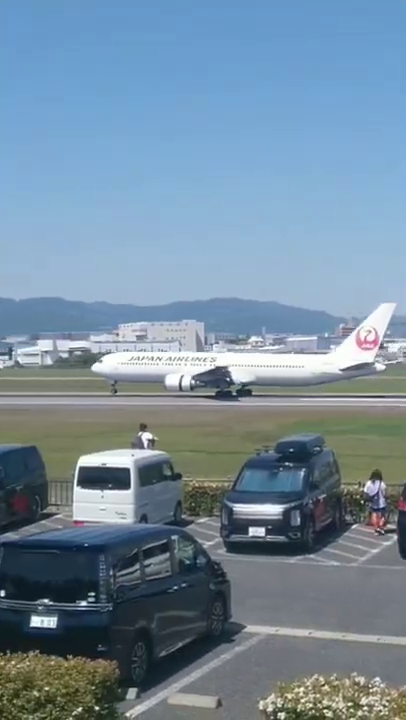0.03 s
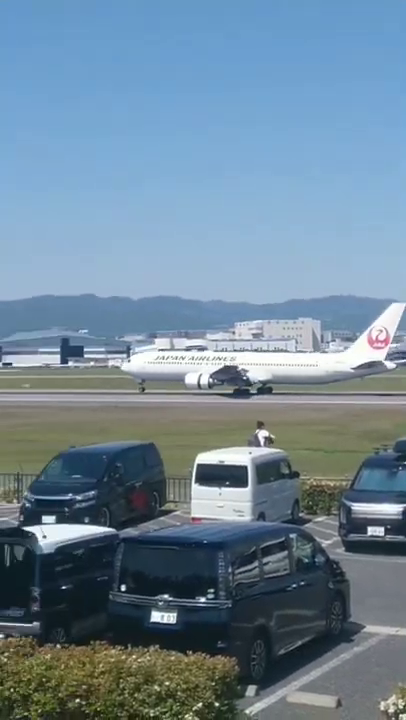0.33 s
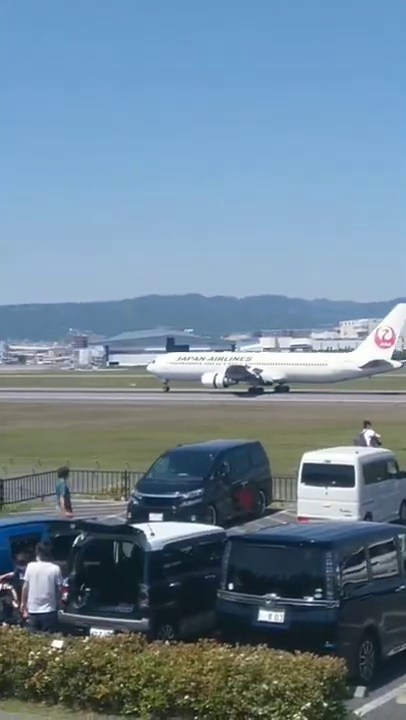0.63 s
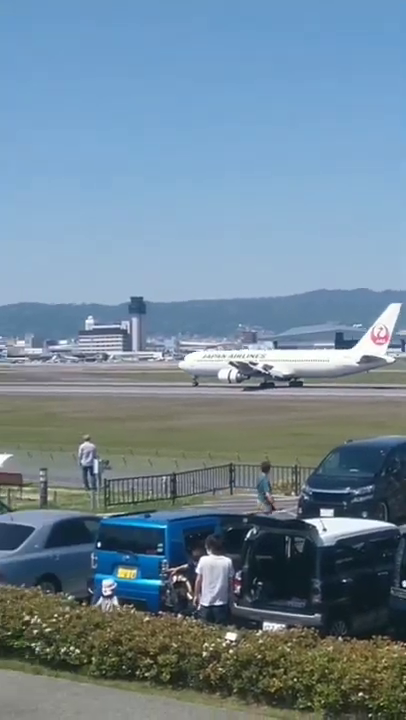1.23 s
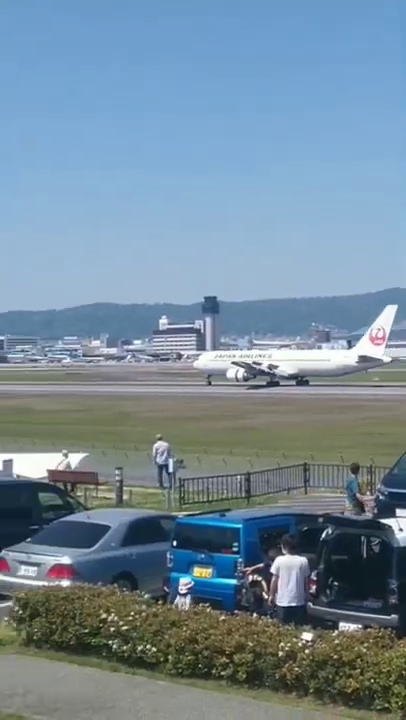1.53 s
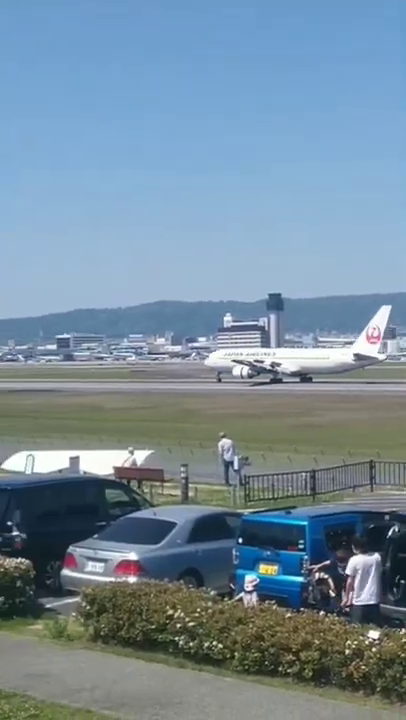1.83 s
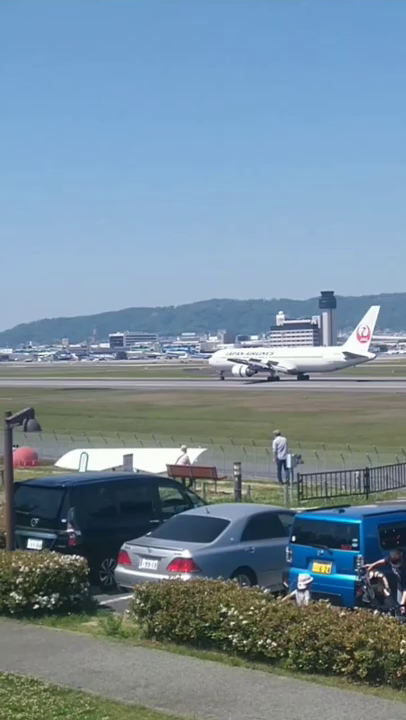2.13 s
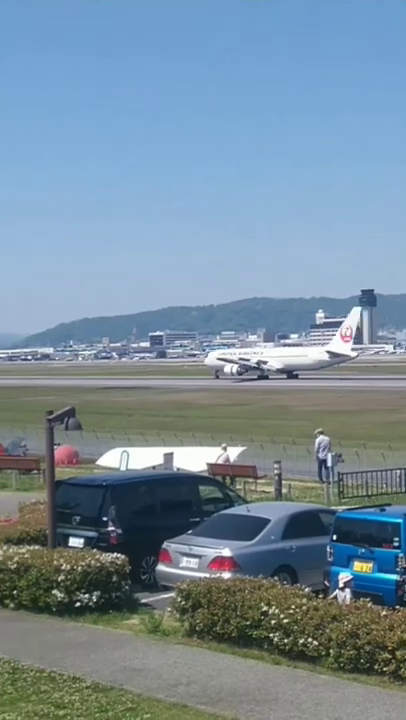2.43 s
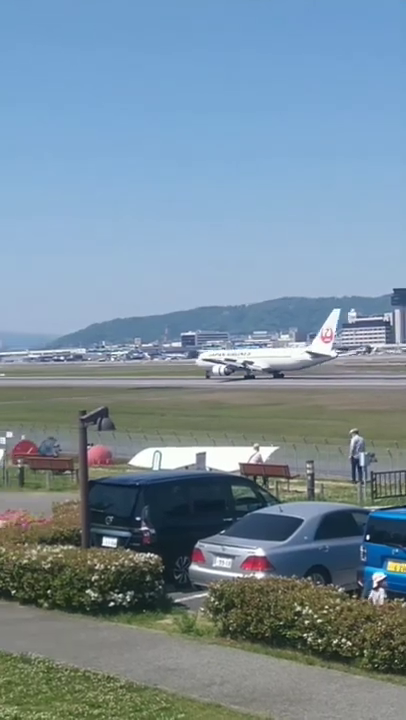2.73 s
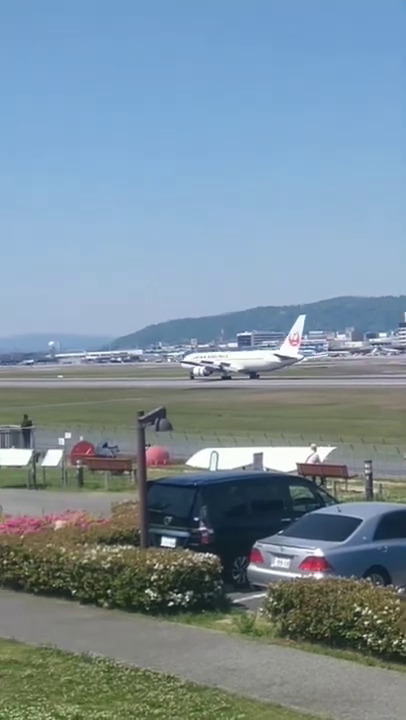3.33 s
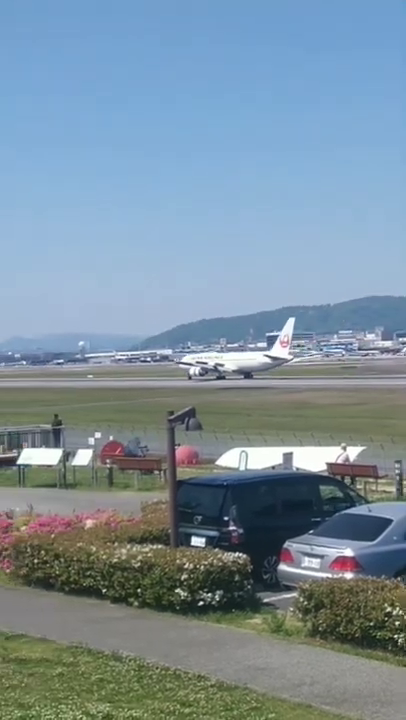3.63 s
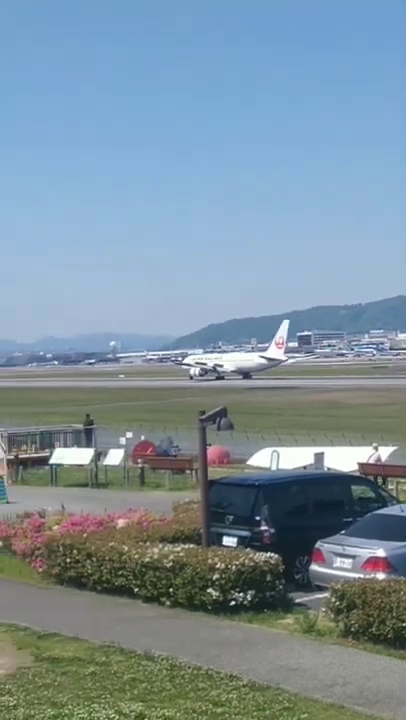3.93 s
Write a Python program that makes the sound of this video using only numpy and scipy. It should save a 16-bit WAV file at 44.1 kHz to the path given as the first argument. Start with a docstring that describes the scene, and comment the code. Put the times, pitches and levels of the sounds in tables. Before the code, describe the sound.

A jet airliner roars down a runway, its rumble and whine slowly receding.

```python
"""A jet airliner's rumble, roar and slightly crackling hiss swell and fade as it rolls away down a
runway at take-off power. The exhaust makes the noise; moving air makes it surge and flicker.
The fan's blurred whine sinks in pitch as it recedes. The ground reflection combs the spectrum and
hollows out one band. It is heard from a park through a hand-held pair of microphone ports, with
faint rustles and handling ticks close by."""
import sys
import numpy as np
from scipy import signal
from scipy.fft import rfft, irfft
from scipy.io import wavfile
from scipy.ndimage import uniform_filter1d, minimum_filter1d

SR = 44100
rng = np.random.default_rng(int(sys.argv[2]) if len(sys.argv) > 2 else 0)


def generate_wav(signal):
    """Clip the signal to [-1, 1] and save it as 16-bit WAV at the path in sys.argv[1]."""
    frames = np.transpose(np.atleast_2d(signal))
    scaled = np.clip(frames, -1, 1) * 32767
    pcm = np.round(scaled).astype(np.int16)
    wavfile.write(sys.argv[1], SR, pcm)


N = 176400
FRAME, HOP = 1024, 256
TIME_S, BIN_HZ = np.arange(N) / SR, np.fft.rfftfreq(N, 1 / SR)
FRAME_S, FRAME_HZ = np.arange(N // HOP + 5) * HOP / SR, np.fft.rfftfreq(FRAME, 1 / SR)

# Exhaust spectrum before the layer gains. Each row: frequency in Hz, relative density in dB.
EXHAUST_COLOUR = [(20,-26), (34,-19.5), (55,-7), (80,-0.45), (128,-1), (195,-9.5), (400,-14), (1000,-13.5),
                  (2000,-14.5), (3300,-19), (4400,-28.5), (5500,-42), (7000,-47.5), (9000,-68), (14000,-82),
                  (16000,-91.5)]
# Swells of the five exhaust layers. Each row: time in seconds, level in dB before the layer's trim.
RUMBLE_SWELL = [(0, -18), (.28, -17.5), (.6, -14.5), (.9, -20.5), (1.3, -17), (1.55, -20), (1.8, -17),
                (2.1, -21.5), (2.27, -16.5), (2.42, -23), (2.67, -19), (3.08, -21), (3.25, -18.5),
                (3.58, -18.5), (3.72, -21.5), (4, -20)]
LOW_ROAR_SWELL = [(0, -16.5), (.42, -18), (.69, -14), (1.38, -21.5), (1.85, -18.5), (2.8, -21.5),
                  (3.5, -23), (3.75, -21)]
ROAR_SWELL = [(0, -18.5), (.42, -18.5), (.68, -17), (.85, -14.5), (1.05, -18), (1.35, -21.5), (1.55, -20.5),
              (1.66, -17), (2.07, -19), (2.42, -17), (2.8, -22.5), (3.05, -23.7), (3.28, -26), (3.52, -25),
              (3.66, -21.5), (4, -23)]
UPPER_ROAR_SWELL = [(0, -20.5), (.5, -25), (.68, -21), (.96, -21), (1.33, -24.5), (1.55, -25),
                    (1.64, -23.5), (1.96, -20), (2.1, -23), (2.28, -22), (2.46, -21.5), (2.601, -23),
                    (2.8, -26.7), (3.48, -31), (3.72, -29.5), (4, -28.5)]
HISS_SWELL = [(0, -29), (.42, -32.5), (.6, -32), (.66, -27), (.94, -28.5), (1.07, -32.5), (1.169, -35),
              (1.551, -37), (1.64, -33), (1.73, -35), (1.93, -31), (2.02, -36), (2.24, -35.5), (2.35, -33),
              (2.45, -36), (2.8, -42), (3.48, -48), (3.72, -43), (4, -46.5)]
# Trim of each layer in dB, rumble to hiss.
LAYER_TRIM_DB = [5.6, 6.42, 6.3, 9.8, 20.47]
# Layer positions in Hz: rumble end, low roar, roar from and to, upper roar from and to, hiss start.
LAYER_KNOTS_HZ = [150, 340, 800, 1300, 2000, 3000, 4200]
# Moving air focuses a band. Each row: peak in seconds, gain in dB, half length in seconds, centre in Hz.
AIR_SURGES = [(0.191, 3, 0.059, 563), (0.32, 7.5, .09, 166), (0.661, 1.5, 0.019, 3370),
              (1.644, 4, 0.024, 1100), (1.999, 4, 0.037, 1124), (2.353, 3, .025, 3290)]
# Blade-passing tone. Each row: time in seconds, pitch in Hz, level in dB, width in Hz.
FAN_TONE = [(0, 1839, -19.5, 119.1), (.3, 1822, -26.5, 119.9), (.8, 1795, -22, 119.7),
            (.93, 1739, -22.5, 100.5), (1.1, 1707, -23.5, 69.8), (1.35, 1704, -26, 69.85),
            (1.95, 1675, -27.5, 69.9), (2.17, 1625, -24.5, 50.16), (2.55, 1633, -24.5, 55.25),
            (2.8, 1589, -26, 45.15), (3.15, 1567, -34.5, 39.9), (4, 1540, -28.5, 44.5)]
# Fan's second harmonic. Each row: time in seconds, level in dB relative to octave_db.
FAN_OCTAVE = [(1.6, -3), (2.5, 5), (3.2, -1), (4, -1.5)]
# Band cancelled by the ground reflection. Each row: time in seconds, centre in Hz, depth in dB.
GROUND_NOTCH = [(1.2, 452, 1), (2.05, 490, 2.5), (2.85, 510, 4.5), (3.25, 553, 11), (3.6, 488, 6.5),
                (4, 490, 5)]
# Comb of peaks and dips from the ground reflection, as heard at the left and right ports.
# Each row: frequency in Hz, left gain in dB, right gain in dB.
GROUND_COMB = [(298,-3.5,1.18), (506,-5,0.5), (650,0.6,3), (1003,-4,-0.2), (1284,-3,6.3), (1480,-3.5,-7),
               (1635,-2.5,3), (1980,-3.5,4.5), (2333,-16.5,2.5), (2513,-7.5,-2), (2820,-15,5.5),
               (3000,-3.5,3), (3670,-2,1.1), (4120,2,1), (4670,3.5,-5.5), (5100,0,4), (6950,0.5,-4.5)]
# Phase between the ports at mid-scene. Each row: frequency in Hz, left lead in radians.
PORT_LEAD = [(20, 0), (300, .08), (750, .4), (1050, .4), (1280, 1.0), (1460, 2.1), (1550, -.7), (1950, .7),
             (2200, .9), (2400, 3.1), (2680, 2.8), (2830, 5.2), (3100, 6.2), (4250, 7.9), (5200, 7.8),
             (6200, 9.2)]
# Left-right likeness. Each row: frequency in Hz, coherence from 0 to 1.
PORT_COHERENCE = [(60, .996), (300, .985), (500, .94), (750, .96), (1270, .88), (1500, .4), (1700, .78),
                  (2000, .88), (2450, .3), (2780, .5), (3100, .86), (4300, .75), (5400, .55), (9000, .3)]
# Rustles. Each row: peak in seconds, left level in dB, rise in seconds, decay in seconds.
RUSTLE_EVENTS = [(.08, -51.5, 0.15, 0.15), (1.33, -52.5, .035, 0.082), (2.9, -55.5, .012, 0.056),
                 (3.303, -51, .005, 0.023), (3.45, -63, .1, .25), (3.75, -45.5, 0.04, 0.073),
                 (3.95, -57, .12, 0.19)]
# Handling ticks. Each row: start in seconds, level in dB, left minus right in dB.
TICK_EVENTS = [(.0555, -53, 16), (.5712, -43, -13.5), (.626, -52, -5)]
# Rustle and tick spectra. Each row: frequency in Hz, relative density in dB.
RUSTLE_SPECTRUM = [(1500, -20), (5000, 8), (7000, -7.5), (9500, 4), (11600, -1), (13000, -18), (16000, -40)]
TICK_SPECTRUM = [(2000, -15), (7500, -2), (16000, -10)]


def amp(db):
    """Decibels to gain."""
    return 10 ** (np.asarray(db) / 20)


def unit(x):
    """Scales to rms 1."""
    return x / np.sqrt(np.mean(abs(x) ** 2) + 1e-20)


def at_hz(table, hz, column=1):
    """Table column over log frequency."""
    rows = np.array(table, float)
    return np.interp(np.log(hz + 1), np.log(rows[:, 0] + 1), rows[:, column])


def at_time(table, time_s, column=1):
    """Table column over time."""
    rows = np.array(table, float)
    return np.interp(time_s, rows[:, 0], rows[:, column])


def blur(x, span, axis=0):
    """Smooths one axis over a span of steps; rms 1."""
    size = x.shape[axis]
    lowpass = np.exp(-(2 * span * np.fft.rfftfreq(size)) ** 2)
    smooth = irfft(rfft(np.moveaxis(x, axis, -1)) * lowpass, size)
    return unit(np.moveaxis(smooth, -1, axis))


def noise(colour):
    """Two independent noises with the given spectrum; rms 1."""
    return unit(irfft(rfft(rng.standard_normal((2, N))) * amp(at_hz(colour, BIN_HZ)), N))


def stft(x):
    """Short-time spectra: channels, bins, frames."""
    return signal.stft(x, nperseg=FRAME, noverlap=FRAME - HOP)[2]


def istft(spectra):
    """Short-time spectra to sound."""
    return signal.istft(spectra, nperseg=FRAME, noverlap=FRAME - HOP)[1][:, :N]


def moving_air_db(time_s, surge_half_octaves=.55, patch_db=.96, patch_s=.06, patch_hz=298,
                  flutter_db=.54, flutter_s=.026):
    """Turbulent air focuses single bands and makes the spectrum flicker, most in the treble."""
    surge_db = 0
    for peak_s, gain_db, half_s, centre_hz in AIR_SURGES:
        octaves = np.log2((FRAME_HZ[:, None] + 1) / centre_hz)
        in_band = np.exp(-(octaves / surge_half_octaves) ** 2)
        surge_db += gain_db * in_band * np.exp(-((time_s - peak_s) / half_s) ** 2)
    patches = blur(rng.standard_normal(surge_db.shape), patch_hz / FRAME_HZ[1])
    patches = blur(patches, patch_s * SR / HOP, axis=1)
    flutter = blur(rng.standard_normal(len(time_s)), flutter_s * SR / HOP)
    depth = np.minimum(np.sqrt(FRAME_HZ / 3000), 1.3)[:, None]  # patch_db, flutter_db hold at 3 kHz
    return surge_db + depth * (patch_db * patches + flutter_db * flutter)


def crackle(jet, depth_db=.6, grain_s=.0058, corner_hz=2200):
    """Adds a quick unevenness to the treble."""
    treble = irfft(rfft(jet) * BIN_HZ ** 4 / (BIN_HZ ** 4 + corner_hz ** 4), N)
    gain = unit(amp(depth_db * blur(rng.standard_normal(N), grain_s * SR)))
    return jet + treble * (gain - 1)


def exhaust():
    """Jet mixing noise: five layers swell and fade in moving air, with crackle on top."""
    spectra = stft(noise(EXHAUST_COLOUR))
    time_s = FRAME_S[:spectra.shape[2]]
    swells = RUMBLE_SWELL, LOW_ROAR_SWELL, ROAR_SWELL, UPPER_ROAR_SWELL, HISS_SWELL
    rumble, low, roar, upper, hiss = [at_time(s, time_s) + db for s, db in zip(swells, LAYER_TRIM_DB)]
    knots_db = np.transpose([rumble, low, roar, roar, upper, upper, hiss])
    level_db = np.array([np.interp(FRAME_HZ, LAYER_KNOTS_HZ, frame) for frame in knots_db]).T
    return crackle(istft(spectra * amp(level_db + moving_air_db(time_s))))


def whine(pitch_hz, width_hz):
    """Two tones on one pitch curve, each blurred into a band by random amplitude and phase."""
    wobble_cycles = np.cumsum(width_hz * np.ones(N)) / SR
    grid_cycles = np.arange(8192) / 4
    wobbles = blur(rng.standard_normal((4, len(grid_cycles))), 3, axis=1)
    parts = np.array([np.interp(wobble_cycles, grid_cycles, wobble) for wobble in wobbles])
    envelopes = parts[::2] + 1j * parts[1::2]
    carrier = np.exp(2j * np.pi * np.cumsum(pitch_hz) / SR)
    return unit((envelopes * carrier).real)


def fan(octave_db=-35.5, octave_width_hz=258.5):
    """Blade-passing tone and its octave, sinking as the aircraft recedes."""
    pitch_hz, level_db, width_hz = [at_time(FAN_TONE, TIME_S, column) for column in (1, 2, 3)]
    tone = amp(level_db) * whine(pitch_hz, width_hz)
    octave = amp(octave_db + at_time(FAN_OCTAVE, TIME_S)) * whine(2 * pitch_hz, octave_width_hz)
    return tone + octave


def ground_notch(aircraft, half_width_hz=51):
    """Sound glancing off the airfield cancels part of one band, deepest far away."""
    spectra = stft(aircraft)
    time_s = FRAME_S[:spectra.shape[2]]
    offset = (FRAME_HZ[:, None] - at_time(GROUND_NOTCH, time_s)) / half_width_hz
    depth_db = at_time(GROUND_NOTCH, time_s, column=2)
    return istft(spectra * amp(-depth_db * np.exp(-offset ** 2)))


def ports(aircraft, turn_rad_per_khz_s=.13):
    """Two ports hear the ground-combed aircraft partly alike; the left lead grows as it moves round."""
    shared, separate = stft(aircraft)
    time_s = FRAME_S[:shared.shape[1]]
    coherence = at_hz(PORT_COHERENCE, FRAME_HZ)[:, None]
    turn_rad = turn_rad_per_khz_s * np.outer(FRAME_HZ / 1000, time_s - time_s.mean())
    left = (coherence * shared + np.sqrt(1 - coherence ** 2) * separate) * np.exp(1j * turn_rad)
    pair = istft(np.array([left, shared]))
    left_comb, right_comb = [amp(at_hz(GROUND_COMB, BIN_HZ, column)) for column in (1, 2)]
    lead = np.exp(1j * at_hz(PORT_LEAD, BIN_HZ))
    return irfft(rfft(pair) * np.array([left_comb * lead, right_comb]), N)


def rustle(grain_db=2, grain_s=.003, right_db=-10):
    """Soft, grainy brushes of high hiss beside the left port."""
    swell = sum(amp(db) * np.exp(-np.maximum((peak_s - TIME_S) / rise_s, (TIME_S - peak_s) / decay_s))
                for peak_s, db, rise_s, decay_s in RUSTLE_EVENTS)
    grain = unit(amp(grain_db * blur(rng.standard_normal(N), grain_s * SR)))
    return noise(RUSTLE_SPECTRUM) * swell * grain * amp([[0], [right_db]])


def ticks(decay_s=.0007):
    """Dry, sharp clicks of a hand on the casing."""
    bursts = np.zeros((2, N))
    for start_s, level_db, pan_db in TICK_EVENTS:
        gains = amp([[level_db + pan_db / 2], [level_db - pan_db / 2]])
        bursts += gains * (TIME_S >= start_s) * np.exp(-abs(TIME_S - start_s) / decay_s)
    return noise(TICK_SPECTRUM) * bursts


def scene():
    """The aircraft over the ground, heard at both ports; rustles and ticks close by."""
    return ports(ground_notch(exhaust() + fan())) + rustle() + ticks()


def record(dry, ceiling=.97, limiter_s=.004, cutoff_hz=16000):
    """Fast peak limiter, short fades at both ends, then a low-pass."""
    span = int(limiter_s * SR)
    safe_gain = np.minimum(1, ceiling / (abs(dry).max(0) + 1e-9))
    held_gain = minimum_filter1d(safe_gain, 2 * span)
    gain = uniform_filter1d(uniform_filter1d(held_gain, span), span)
    fades = np.minimum(1, np.minimum(TIME_S, TIME_S[::-1]) / limiter_s)
    lowpass = signal.firwin(511, cutoff_hz, window=("kaiser", 9), fs=SR)
    return signal.oaconvolve(dry * gain * fades, lowpass[None], "same")


dry = scene()
out = record(dry)
generate_wav(out)
```